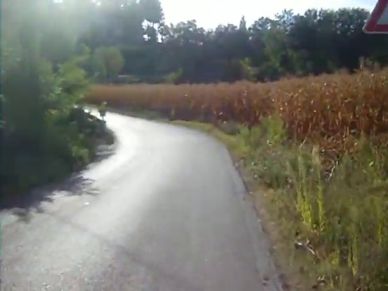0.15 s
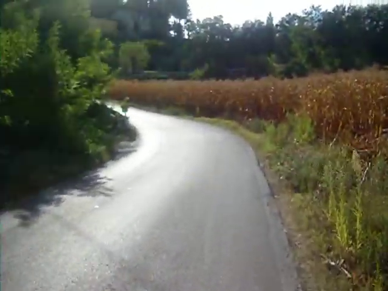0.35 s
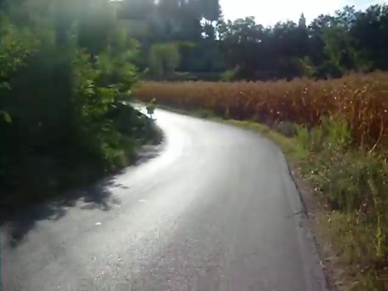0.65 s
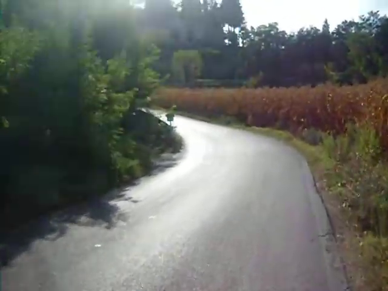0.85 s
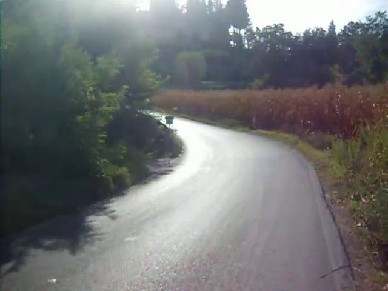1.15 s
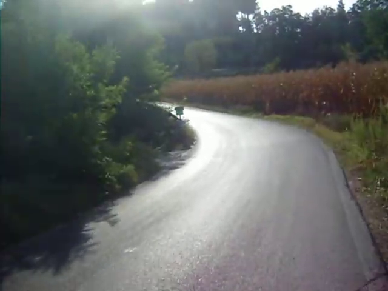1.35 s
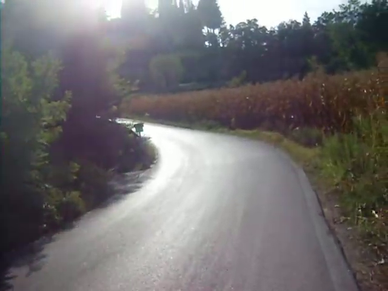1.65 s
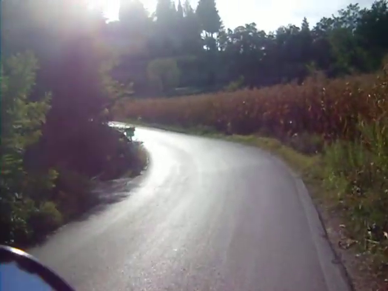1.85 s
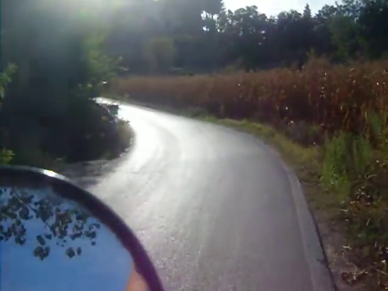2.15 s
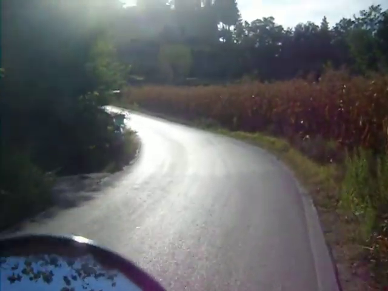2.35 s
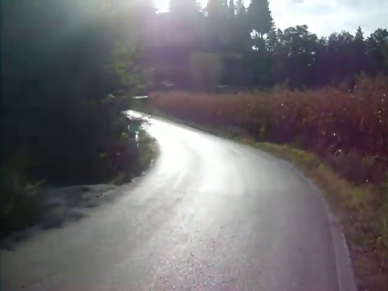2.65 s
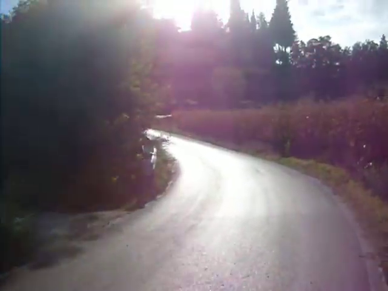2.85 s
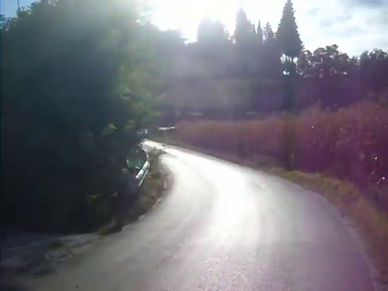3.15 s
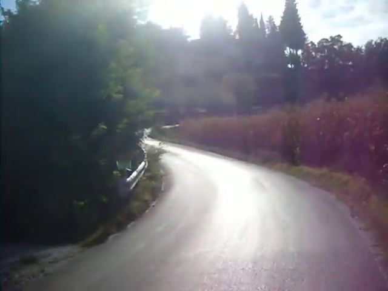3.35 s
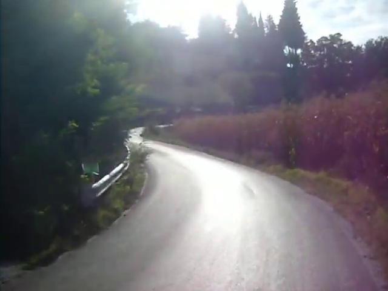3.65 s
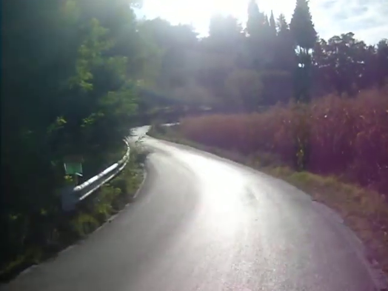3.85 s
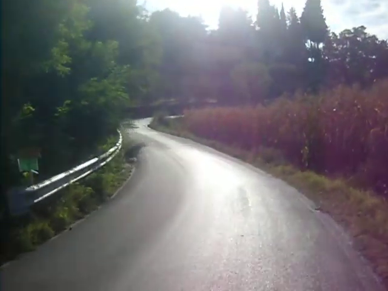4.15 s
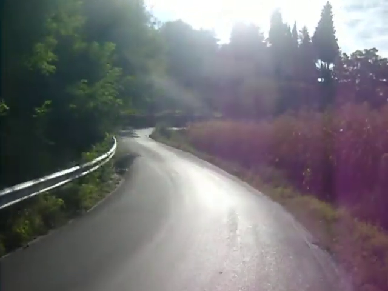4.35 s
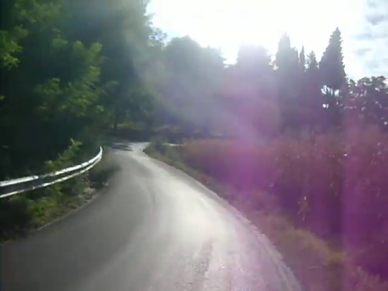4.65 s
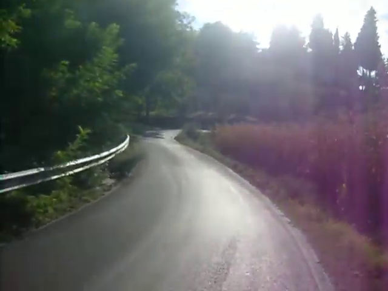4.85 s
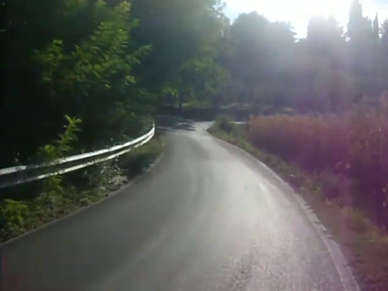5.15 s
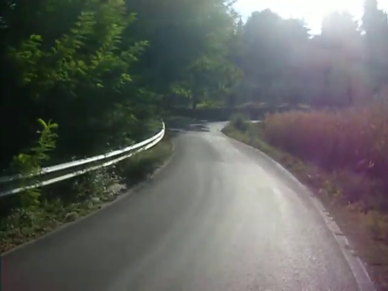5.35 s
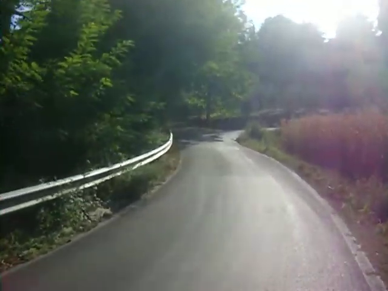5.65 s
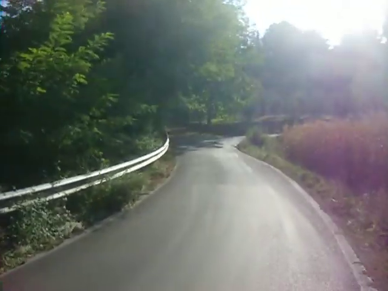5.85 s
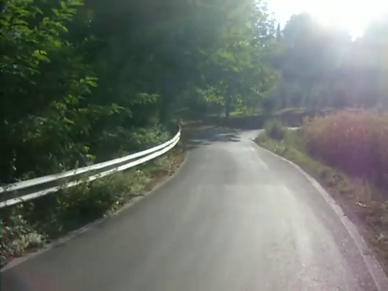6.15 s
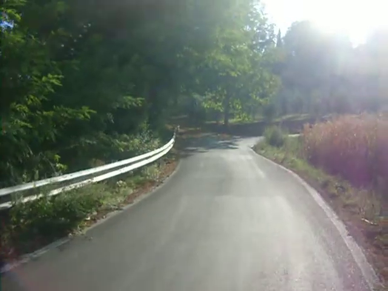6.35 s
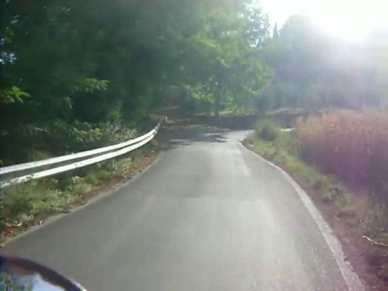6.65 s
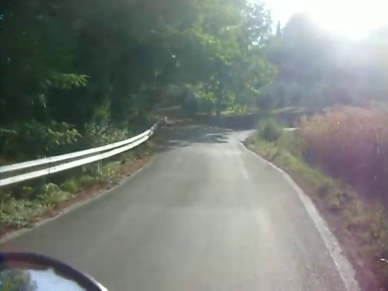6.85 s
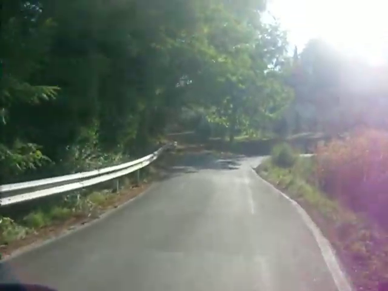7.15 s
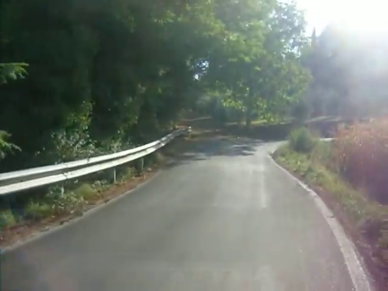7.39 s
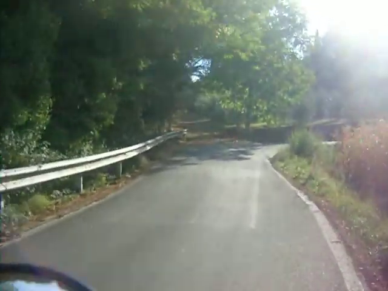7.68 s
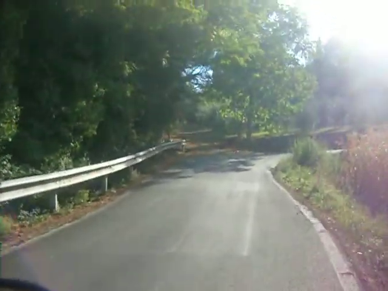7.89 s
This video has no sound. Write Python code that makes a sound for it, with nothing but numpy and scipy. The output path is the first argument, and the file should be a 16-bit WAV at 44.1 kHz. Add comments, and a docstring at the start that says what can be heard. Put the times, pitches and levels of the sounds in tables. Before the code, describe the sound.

A small two-stroke moped engine buzzes uphill, gaining speed then holding steady, while wind gusts buffet the microphone.

```python
"""A small two-stroke moped engine pulls up a country hill, heard from the saddle; it gains speed, then holds.
One firing a turn makes a harmonic series, which slides through the resonances of pipe and casing. Gears whine,
the casing clatters, a loose fitting rings under impacts, and a thin squeal sounds at low revs. Turbulent air
rushes and rumbles, the tyres hiss, and gusts overload the microphone."""
import sys
import numpy as np
from scipy import signal
from scipy.fft import rfft, irfft, next_fast_len
from scipy.io import wavfile
from scipy.ndimage import uniform_filter1d

SR = 44100
rng = np.random.default_rng(int(sys.argv[2]) if len(sys.argv) > 2 else 0)


def persist_wave(psi):
    """Save psi, clipped to +-1, as 16-bit WAV."""
    counts = np.round(np.clip(psi, -1, 1) * 32767).astype(np.int16)
    wavfile.write(sys.argv[1], SR, np.atleast_2d(counts).T)


N = 353682
TIME = np.arange(N) / SR
TICKS = TIME[::40]  # coarse clock for slow controls

# Levels in all tables are relative: each source applies its own gain.
# rotation rate of the crankshaft, equal to the firing rate: t/s, f/Hz
CRANK_SPEED = [(0.0, 52.4), (0.6, 50.3), (0.9, 51.45), (1.52, 54.15), (1.84, 53.95), (2.08, 56.2),
               (2.72, 60.5), (3.2, 62.95), (3.8, 65.25), (4.7, 67.28), (5.8, 67.28), (6.08, 67.15),
               (6.6, 67.7), (7.36, 66.92), (7.6, 67.15), (8.02, 66.85)]
# gusts at the microphone: t/s, peak level/dB, length/s
GUSTS = [(0.122, -9.5, 0.0022), (0.138, -15, 0.066), (0.303, -13.5, 0.088), (0.355, -10, 0.044),
         (0.451, -9.5, 0.025), (0.51, -9, 0.036), (0.563, -13, 0.0055), (0.606, -14.5, 0.016),
         (0.644, -17, 0.014), (0.692, -12.5, 0.012), (0.755, -13.5, 0.0061), (0.953, -9.5, 0.02),
         (0.994, -9, 0.004), (1.044, -10, 0.002), (1.067, -8, 0.0086), (1.096, -1.5, 0.009),
         (1.272, -4.5, 0.028), (1.354, -3.5, 0.04), (1.427, -7.5, 0.008), (1.481, -9.5, 0.055),
         (2.116, -12.5, 0.16), (2.286, -8.5, 0.064), (2.408, -7, 0.081), (2.522, -8, 0.044),
         (2.629, -3, 0.06), (2.716, -10.5, 0.031), (3.06, -7.5, 0.038), (3.156, -11.5, 0.08),
         (3.332, -6, 0.11), (3.426, 0, 0.078), (4.445, -10, 0.049), (4.505, -8, 0.0063),
         (5.069, -10.5, 0.011), (5.823, -5.5, 0.022), (5.868, -2.5, 0.01), (5.906, -12.5, 0.018),
         (6.913, -10.5, 0.014), (6.977, -11.5, 0.012), (7.028, -19.5, 0.03), (7.467, -17.5, 0.17)]
# spectral density of small eddies: f/Hz, level/dB
RUSH_SPECTRUM = [(50, -5.5), (110, -0.5), (280, 2), (600, 0), (1000, -4.5), (1400, -11.5), (2200, -16),
                 (3500, -28), (4400, -40.5)]


def exhaust(turns, flutter, uneven_db):
    """Source and filter: each harmonic of the slightly uneven firing swells as it crosses a resonance."""
    # harmonics of the firing at full load: order, level/dB
    harmonics = [(1, -38), (2, -25.5), (3, -30), (4, -37.5), (5, -41.5), (6, -25.5), (7, -28.5), (8, -32.5),
                 (9, -26.5), (10, -35.5), (11, -41), (12, -28.5), (13, -32), (14, -40.5), (15, -42.5),
                 (16, -30), (17, -41.5), (18, -37.5), (19, -40), (20, -43), (21, -43), (22, -38), (23, -47),
                 (24, -52.5), (25, -45), (26, -44.5), (27, -45.5), (28, -57.5), (29, -51), (30, -55.5),
                 (31, -48.5), (32, -41.5), (33, -37), (34, -46), (35, -49), (36, -37.5), (37, -46),
                 (38, -54.5), (39, -46.5), (40, -55.5), (41, -45.5), (42, -52)]
    # pipe and casing resonances: f/Hz, half width/Hz, gain/dB
    resonances = [(482.6, 18, 5.5), (660, 8, -2), (1025, 28, 10.5), (1160, 11, 1.5)]
    speed, = in_time(CRANK_SPEED, TICKS)
    pressure = 0
    for order, db in harmonics:
        lift_db = sum(peak / (1 + ((order * speed - hz) / width) ** 2) for hz, width, peak in resonances)
        gain = from_db(db + lift_db) * (1 + flutter * drift(2.8, TICKS))
        phase = 2 * np.pi * (order * turns + rng.random())
        pressure += np.interp(TIME, TICKS, gain) * np.cos(phase)
    load_db = -4 * shortfall() ** 2
    return np.sqrt(2) * pressure * from_db(load_db + uneven_db * drift(42))


def gear_whine(speed, level_db, drop_db):
    """Tooth meshing: tones blurred by backlash, two between the harmonics and one that settles onto the 29th,
    grow as the drive takes up load."""
    # transmission tones: multiple of drive speed, level/dB, rms pitch wander/Hz
    mesh_tones = [(7.26, -32.5, 2.6), (14.54, -31.5, 4.12), (29, -43, 4.5)]
    # slip of the drive until the moped is up to speed: t/s, fraction of crank speed lost
    drive_slip = [(2, .06), (3.9, .025), (4.6, .009), (5.9, 0)]
    slip, = in_time(drive_slip)
    turns = np.cumsum(speed * (1 - slip)) / SR
    whine = 0
    for ratio, db, wander_hz in mesh_tones:
        backlash = np.cumsum(wander_hz * drift(9)) / SR
        whine += from_db(db) * np.sin(2 * np.pi * (ratio * turns + backlash))
    return np.sqrt(2) * from_db(level_db - drop_db * shortfall() ** 2) * whine


def clatter(turns, level_db, throb_db, grain_db):
    """Amplitude modulation: casing noise pulses with every turn, in grains of uneven strength."""
    # spectral density of piston, chain and intake noise: f/Hz, level/dB
    spectrum = [(250, -11.5), (450, -9), (680, 1.5), (880, 5.5), (1060, 3), (1220, -12), (1550, -17),
                (1850, -5.5), (2500, -3), (2850, -5.5), (3130, -12.5), (3400, -6.5), (3650, -11),
                (3950, -22.5), (4400, -31)]
    pulsing = from_db(throb_db * np.cos(2 * np.pi * turns) + grain_db * drift(200))
    return from_db(level_db) * noise(spectrum, pulsing)


def loose_fitting(turns, knock_db, uneven_db, limp_db, jitter_s, contact_hz):
    """Impacts excite modes: a fitting taps once a turn, and bumps in the road knock it harder."""
    # strength of the steady tapping: t/s, level/dB
    tapping = [(0, -28), (.9, -25.5), (1.25, -19), (2.1, -24.5), (4.0, -23), (4.7, -22)]
    # knocks from the road: t/s, level/dB
    knocks = [(1.2121, -19), (1.6811, -13.5), (2.2957, -16), (2.5167, -15), (3.3648, -12), (5.8197, -9)]
    # modes of the fitting: f/Hz, level/dB, T60/s
    modes = [(2200, -11, 0.018), (2860, -6, 0.018), (3360, -14, 0.026), (3620, -3, 0.019),
             (3719, -3.5, 0.02)]
    tapping_db, = in_time(tapping)
    taps = np.flatnonzero(np.diff(np.floor(turns)))
    strength, lateness = rng.standard_normal((len(taps), 2)).T
    onsets = np.clip(taps + (lateness * jitter_s * SR).astype(int), 0, N - 1)
    weak = np.arange(len(taps)) % 2  # strong and weak taps alternate
    clicks = np.zeros(N)
    clicks[onsets] = from_db(tapping_db[taps] + uneven_db * strength - limp_db * weak)
    for t, db in knocks:
        clicks[int(t * SR)] += from_db(db + knock_db)
    # the contact is soft, and neighbouring modes start in antiphase
    force = low_pass(clicks + 1e-18, contact_hz, order=8, ripple_db=.5)
    return sum((-1) ** k * from_db(db) * ring(force, hz, t60) for k, (hz, db, t60) in enumerate(modes))


def squeal(start_hz, rise_hz_per_s):
    """Frequency modulation: a thin rising tone chirps twice, then turns hoarse as its pitch jitters more."""
    # squeals at low revs: t/s, peak level/dB, length/s, rms pitch wander/Hz
    squeals = [(.735, -29, .025, 23.9), (.82, -27.5, 0.026, 22), (.92, -40, 0.083, 35),
               (1.65, -32, .22, 75)]
    *_, wander_hz = in_time(squeals)
    glide_hz = start_hz + rise_hz_per_s * (TIME - squeals[0][0])
    phase = 2 * np.pi * np.cumsum(glide_hz + wander_hz * drift(60)) / SR
    return np.sqrt(2) * envelope(swells(squeals)) * np.sin(phase)


def wind_gusts(buffet_db, slap_db, ragged_db, lumpy_db):
    """Turbulence at the microphone port: the shorter a gust, the smaller its eddies and the brighter it is."""
    # spectral density of long gusts: f/Hz, level/dB
    buffet_spectrum = [(40, -16.5), (100, -0.5), (170, 5), (350, 1), (600, -1.5), (1000, -8.5), (1500, -18),
                       (2300, -30.5), (3500, -30.5), (4400, -60)]
    # spectral density of short gusts: f/Hz, level/dB
    slap_spectrum = [(80, -6), (300, 4), (800, -2), (1400, -10), (2400, -16.5), (4400, -45.5)]
    powers = swells(GUSTS, front=4.6, tail=1.94)  # a gust arrives more steeply than it leaves
    length_s = np.array(GUSTS)[:, 2:]
    slap_share = 1 / (1 + (length_s / 0.033) ** 2)
    buffet = evened(noise(buffet_spectrum), span_s=0.013) * from_db(buffet_db + ragged_db * drift(90))
    lumps = from_db(lumpy_db * drift(300))
    slap = evened(noise(slap_spectrum, lumps), span_s=0.0073) * from_db(slap_db)
    return buffet * envelope(powers * (1 - slap_share)) + slap * envelope(powers * slap_share)


def wind_rumble(level_db, floor_db, wake_db):
    """Incoherent sources add in power: big slow eddies and the wakes of gusts rumble over a steady floor."""
    # big eddies rolling over the microphone: t/s, peak level/dB, length/s
    eddies = [(.33, -18, 0.44), (1.2, -12, 0.076), (1.42, -19, 0.3), (1.92, -16, 0.09), (2.3, -22, 0.17),
              (2.9, -26, .35), (4.25, -23.5, 0.31), (4.5, -16.5, 0.11), (5.15, -26, 0.35),
              (6.45, -26, 0.79)]
    # spectral density of big eddies: f/Hz, level/dB
    spectrum = [(12, -3.5), (25, 4.5), (50, 1), (90, -4), (150, -8), (300, -43)]
    wakes = from_db(wake_db) * envelope(swells(GUSTS))
    heave = np.sqrt(from_db(floor_db) ** 2 + envelope(swells(eddies)) ** 2 + wakes ** 2)
    return from_db(level_db) * heave * evened(noise(spectrum), span_s=0.23)


def air_rush(flicker_db):
    """Flow noise: many small eddies merge into a continuous, flickering rush."""
    # strength of the rush: t/s, level/dB
    rush_levels = [(0, -32), (.85, -23), (2.85, -20), (4.8, -25), (7.2, -22.5), (8.02, -27)]
    rush_db, = in_time(rush_levels)
    return from_db(rush_db) * noise(RUSH_SPECTRUM, from_db(flicker_db * drift(74)))


def tyre_hiss(level_db, drop_db):
    """Rolling noise: the tyres hiss louder as the speed builds."""
    # spectral density of the tyre noise: f/Hz, level/dB
    spectrum = [(500, -5.5), (900, -6), (1300, -4), (1700, -1), (2400, -8), (4000, -23)]
    return from_db(level_db - drop_db * shortfall()) * noise(spectrum)


def eddy_pops(per_s, level_db, spread_db):
    """Shot noise: lone eddies burst on the port at random, fading as the airflow steadies at full speed."""
    sizes = from_db(spread_db * np.minimum(rng.exponential(1, N), 3))
    bursts = (rng.random(N) < per_s / SR) * sizes
    return from_db(level_db) * coloured(bursts, RUSH_SPECTRUM) * shortfall()


def shortfall():
    """How far the engine is below full speed: 1 at its lowest revs, 0 at its highest."""
    speed, = in_time(CRANK_SPEED)
    return (speed.max() - speed) / np.ptp(speed)


def from_db(db):
    """Amplitude ratio of a level."""
    return 10 ** (np.asarray(db) / 20)


def rms_one(x):
    """Normalisation to unit power."""
    return x / np.sqrt(np.mean(x ** 2) + 1e-20)


def in_time(rows, times=TIME):
    """Linear interpolation of each column against the first, t/s."""
    t, *columns = np.transpose(rows)
    return [np.interp(times, t, column) for column in columns]


def drift(corner_hz, times=TIME):
    """Random fluctuation of rms 1: noise through a two-pole low-pass."""
    pole = np.exp(-2 * np.pi * corner_hz * TICKS[1])
    settling = 2000
    slow = signal.lfilter([1], [1, -2 * pole, pole * pole], rng.standard_normal(len(TICKS) + settling))
    return np.interp(times, TICKS, rms_one(slow[settling:]))


def coloured(x, spectrum):
    """Spectral shaping of an excitation to rms 1, with nothing above the spectrum's last frequency."""
    hz, db = np.transpose(spectrum)
    size = next_fast_len(N, True)
    bins = np.maximum(np.fft.rfftfreq(size, 1 / SR), 1)
    gain = from_db(np.interp(np.log(bins[bins <= hz[-1]]), np.log(hz), db))
    return rms_one(irfft(rfft(x, size)[:len(gain)] * gain, size)[:N])


def noise(spectrum, modulation=1):
    """Gaussian noise, modulated in amplitude and then coloured; rms 1."""
    return coloured(modulation * rng.standard_normal(N), spectrum)


def evened(x, span_s):
    """Division by the running rms takes the slow swells out of a noise."""
    return x / np.sqrt(uniform_filter1d(x * x, int(span_s * SR)) + 1e-9)


def swells(rows, front=2, tail=2):
    """Power of each swell (t/s, level/dB, length/s) on the coarse clock; front and tail set steepness."""
    t, db, length = np.transpose(rows)[:3, :, None]
    age = np.sqrt(2) * (TICKS - t) / length
    steepness = np.where(age < 0, front, tail)
    return from_db(db) ** 2 * np.exp(-np.minimum(np.abs(age), 8) ** steepness)


def envelope(powers):
    """Amplitude of overlapping swells, whose powers add."""
    return np.interp(TIME, TICKS, np.sqrt(powers.sum(axis=0)))


def ring(force, hz, t60):
    """Damped oscillator: a unit impulse starts a decaying sine of height 1."""
    decay = from_db(-60 / (t60 * SR))
    step = 2 * np.pi * hz / SR
    return signal.lfilter([0, np.sin(step)], [1, -2 * decay * np.cos(step), decay ** 2], force + 1e-18)


def low_pass(x, hz, order, ripple_db):
    """Steep low-pass filter with an equiripple passband."""
    return signal.sosfilt(signal.cheby1(order, ripple_db, hz, fs=SR, output="sos"), x)


def saturate(x, top, hardness):
    """Soft clipping: peaks flatten at top; the higher the hardness, the sharper the corner."""
    return x / (1 + np.abs(x / top) ** hardness) ** (1 / hardness)


def scene():
    """Superposition: machine and wind add at one microphone, and the crank times the engine's sounds."""
    speed, = in_time(CRANK_SPEED)
    turns = np.cumsum(speed + .09 * drift(12)) / SR
    casing = gear_whine(speed, level_db=4.5, drop_db=17.5)
    casing += clatter(turns, level_db=-20, throb_db=0.5, grain_db=1.5)
    casing *= from_db(-3.5 * shortfall() ** 0.44)  # quieter at low revs
    engine = exhaust(turns, flutter=0.16, uneven_db=-0.48) + casing
    engine *= from_db(0.34 * (TIME - TIME[-1]) + .5)  # it works harder the longer the climb lasts
    machine = engine + loose_fitting(turns, knock_db=0.5, uneven_db=1.56, limp_db=3.5,
                                     jitter_s=0.0005, contact_hz=4130)
    machine += squeal(start_hz=1554, rise_hz_per_s=205)
    air = wind_rumble(level_db=-0.5, floor_db=-32.5, wake_db=-14) + air_rush(flicker_db=1)
    tyres = tyre_hiss(level_db=-28, drop_db=32.5)
    air += wind_gusts(buffet_db=-1.74, slap_db=1, ragged_db=4, lumpy_db=5)
    air += eddy_pops(per_s=55, level_db=-29, spread_db=10)
    return (machine + air + tyres)[None]


def record(dry):
    """Overload distortion: the preamplifier rounds peaks; the filter's overshoots clip and spit treble."""
    rounded = saturate(dry, top=0.76, hardness=10.7)
    narrow = low_pass(rounded, hz=4360, order=10, ripple_db=.3)
    clipped = saturate(narrow, top=0.73, hardness=320)
    return low_pass(clipped, hz=15900, order=12, ripple_db=.1)


dry = scene()
out = record(dry)
persist_wave(out)
```